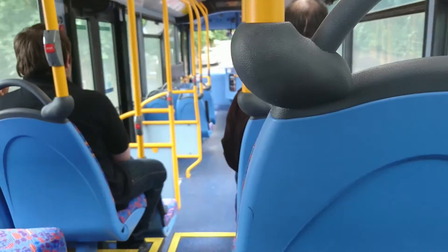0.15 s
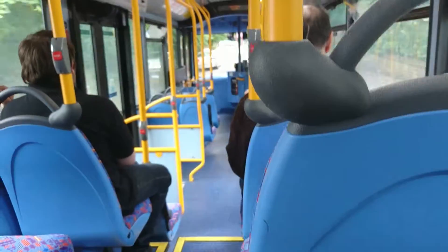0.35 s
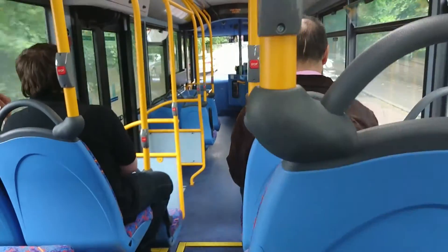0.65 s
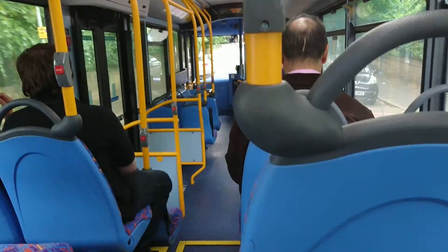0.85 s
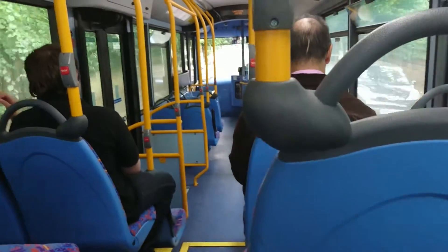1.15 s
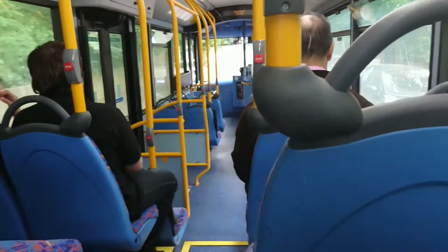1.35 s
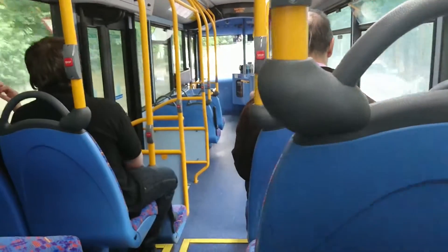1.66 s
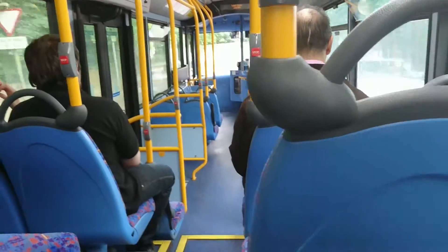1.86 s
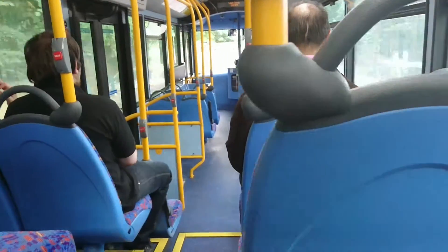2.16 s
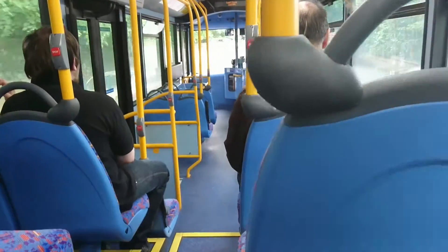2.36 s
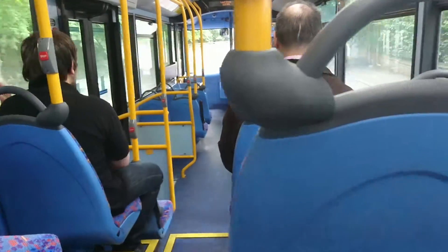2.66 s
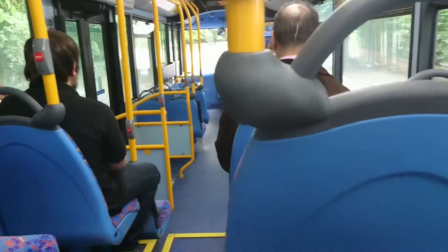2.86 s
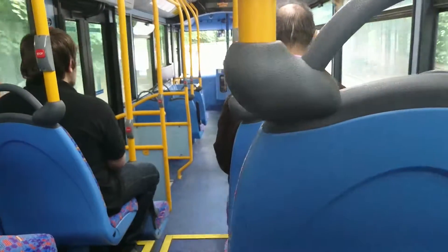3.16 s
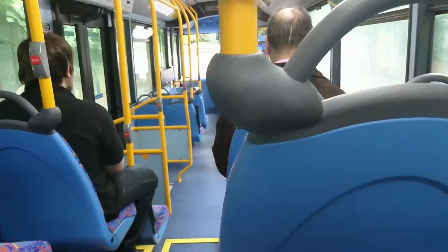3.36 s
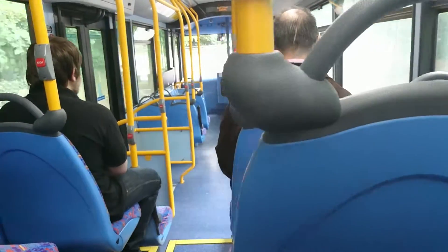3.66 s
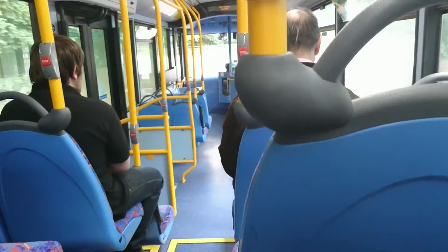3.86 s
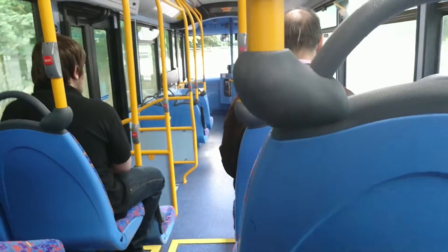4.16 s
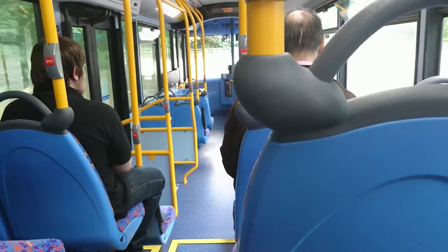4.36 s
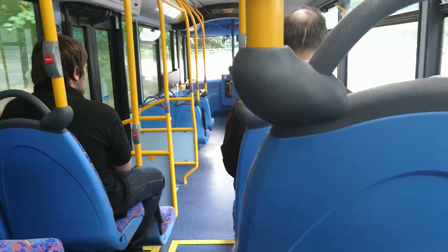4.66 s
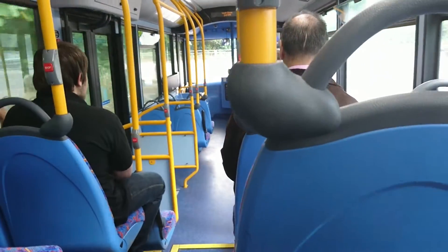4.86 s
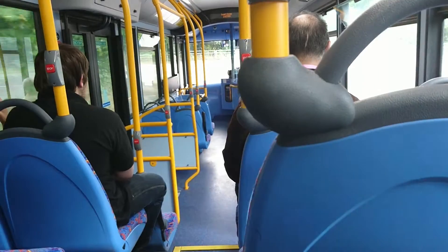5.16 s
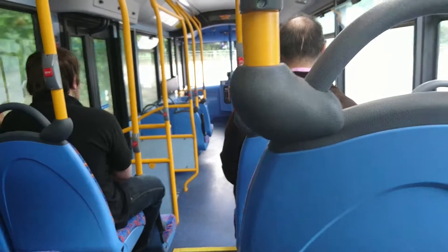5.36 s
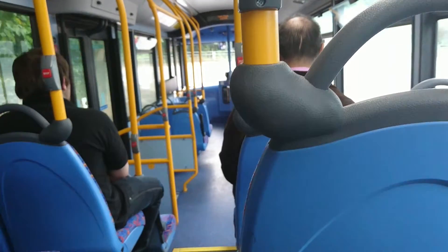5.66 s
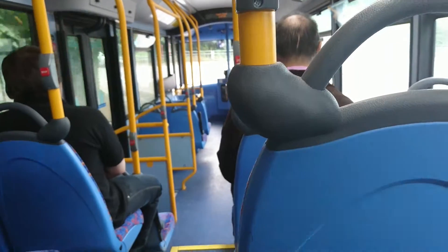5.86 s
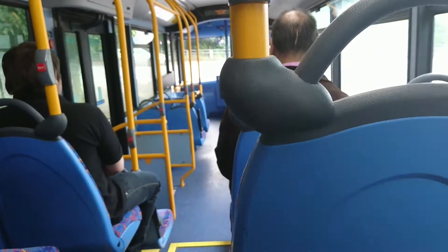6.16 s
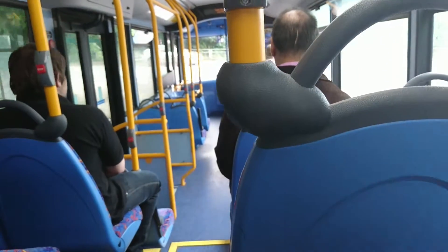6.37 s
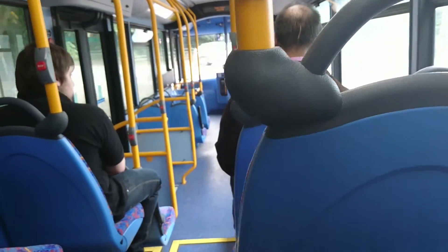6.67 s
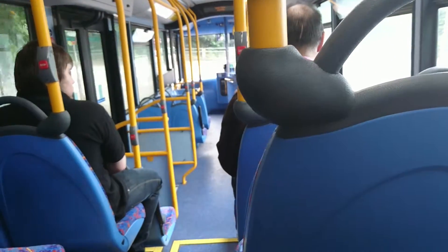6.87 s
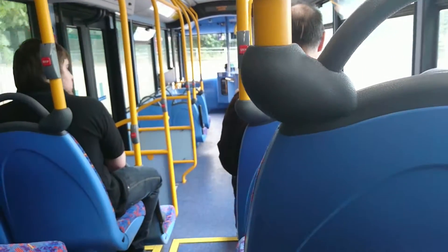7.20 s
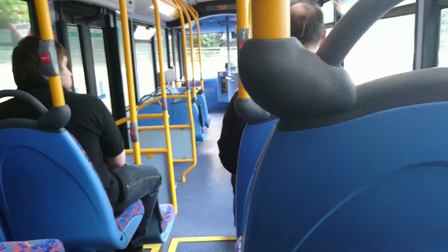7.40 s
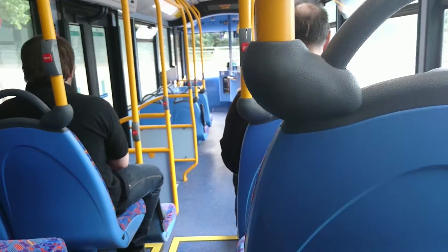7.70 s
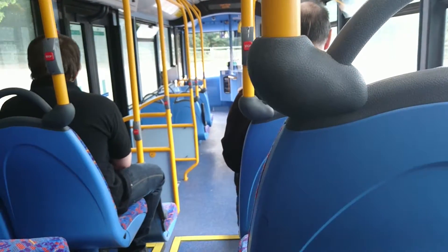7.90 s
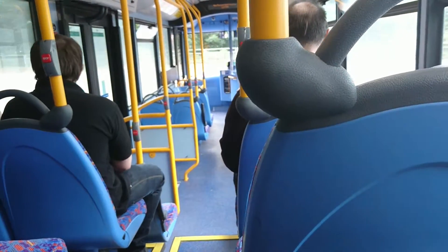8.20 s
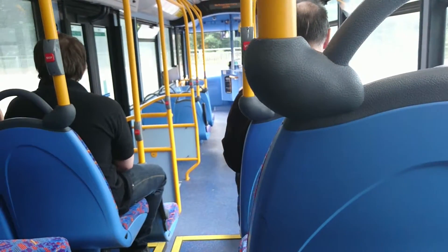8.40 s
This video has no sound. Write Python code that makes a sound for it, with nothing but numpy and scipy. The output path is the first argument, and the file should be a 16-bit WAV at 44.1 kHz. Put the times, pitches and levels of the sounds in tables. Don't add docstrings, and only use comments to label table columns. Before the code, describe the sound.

Close, boxy bus saloon with constant bass-heavy tyre and air roar. The engine drone slides down, eases, jumps back up during a gear change with a brief shaft hum, wavers, then falls away deep and soft. A pump whine follows the same pitch curve. Loose plastic and poles chatter, knock and squeak mostly early on; later there are only lighter bumps and faint creaks. Captured by a small camera in a rear seat.

```python
import sys
import numpy as np
from scipy import signal
from scipy.fft import rfft, irfft, next_fast_len
from scipy.io import wavfile
from scipy.ndimage import uniform_filter1d, minimum_filter1d

SR = 44100
rng = np.random.default_rng(int(sys.argv[2]) if len(sys.argv) > 2 else 0)


def boost_factor(decibels):
    exponent = np.asarray(decibels, float) / 20
    return 10 ** exponent


def output_pcm(signal):
    pcm = np.clip(np.atleast_2d(signal).T, -1, 1) * 32767
    wavfile.write(sys.argv[1], SR, np.round(pcm).astype(np.int16))


N = 376613

# time_s, firing_hz, engine_load_db, pump_load_db
DRIVING = [(0.0, 89.5, 5.5, -1), (1.0, 86.75, -1, -1), (1.4, 85.24, 2.5, 0), (2.25, 81.4, -0.5, -3.5),
           (3.0, 74, -2, -1), (3.5, 68.5, -9.5, -7.5), (3.8, 79.23, -2, 2.5), (4.0, 84.24, 3.5, 0.5),
           (4.14, 86.65, 2, -11.5), (4.5, 81.0, 1, 3), (4.8, 75.3, -7.5, -2), (5.3, 82.76, 2, 1),
           (5.61, 85.4, 3, 1), (6.4, 74.63, -4.5, 2.5), (6.98, 63.77, -12, 1), (7.4, 46.17, -15, -4.5),
           (7.62, 47.5, -7, 1.5), (8.54, 45.03, -12.5, -8)]
# multiple_of_firing, level_db over the roar per Hz at that pitch
WEAK_ORDERS = [
    (.75, 14),
    (2, 6),
    (3, 9),
]
# mode_hz, width_hz, level_db
SALOON_MODES = [(36, 4.8, -34), (45.2, 1.7, -19.5), (81, 8.1, -19.5), (111, 6.9, -19), (133.4, 6.2, -23),
                (158.8, 3.3, -33.5), (199.8, 9.8, -20), (243.6, 7.4, -20), (256, 6, -37),
                (287.5, 5.24, -21), (298, 12, -27.5), (430, 14, -11), (475, 44, -21.5), (566.6, 13, -21)]
# multiple_of_whine, level_db, resonance_hz, width_hz
WHINE_OVERTONES = [(3, -49.5, 630, 160), (7, -42, 2085, 50), (8, -47, 2064, 110), (4, -49.5, 615, 30)]
# time_s, pitch_hz, level_db
SHAFT_HUM = [
    (3.1, 143.5, -60),
    (3.3, 141.3, -30.5),
    (3.75, 130, -31),
    (4.1, 122, -36),
    (4.4, 118.6, -64),
]
# start_s, strength_db, ring_s
TRIM_JOLTS = [(0.818, 7, 0.064), (1.09, -0.5, 0.041), (1.34, 4, .02), (1.461, 13.5, 0.03),
              (1.552, 14, 0.029), (1.59, 11.5, 0.04), (1.66, 10.5, .022), (1.717, 16, 0.021),
              (2.005, 5.5, 0.029), (2.085, 12, 0.069), (2.182, 14.5, 0.09), (2.275, 13.5, 0.047),
              (2.33, 7, 0.024), (2.545, 7, 0.047), (3.429, 5, 0.026), (4.38, 4, 0.023)]
# mode_hz, width_hz, boost_db
TRIM_MODES = [(2420, 72, 4.5), (2057, 140, -0.5), (1830, 42, -3), (3580, 20, 1), (4760, 160, 1.5),
              (6200, 39, -2.5), (7120, 57, -5.5)]
# centre_s, length_s, pitch_hz, width_hz, level_db, left_minus_right_db
RUBS = [(0.496, .06, 3720, 55.56, -56, 12), (2.145, 0.12, 13200, 500, -73, 6),
        (2.615, .16, 11500, 300, -74, 5), (2.932, .07, 14100, 800, -66, 7),
        (2.968, 0.079, 5080, 40, -60, 4), (3.527, 0.1, 2420, 80, -44, -11), (3.747, 0.18, 8040, 60, -74, 4),
        (6.342, 0.031, 13810, 1620, -70, 3.5), (6.726, 0.11, 6880, 37.04, -66, 15.5),
        (7.515, .3, 6910, 32.4, -63, 7), (8.0, .2, 8200, 30, -73, 8), (8.326, 0.033, 6600, 295, -58, 4),
        (0.85, 0.084, 2450, 291.6, -44, -2), (1.09, 0.04, 1830, 75.6, -43, -24),
        (1.235, .04, 1930, 70, -43, -19), (2.552, 0.047, 2390, 74, -43, -4),
        (3.765, .12, 2120, 55, -42, -18)]
# centre_s, pitch_hz, level_db
FAINT_TICKS = [(.56, 12860, -80), (1.219, 13660, -78), (2.49, 12960, -81), (4.079, 13800, -86),
               (4.382, 13100, -83.5), (4.51, 13400, -80), (5.32, 13500, -91), (5.95, 13700, -80),
               (7.41, 13400, -80), (7.959, 13700, -84), (8.15, 13200, -81), (8.34, 13200, -89)]
# mode_hz, width_hz, level_db
SHELL_MODES = [(138.9, 1.5, -38.5), (207.4, 6.6, -39), (245, 7.2, -46.5), (277.6, 2.8, -36),
               (311.6, 2.8, -39.5), (403.6, 1.9, -44.5), (441.5, 22, -40.5), (622.5, 22, -54),
               (2120, 56, -54)]
# time_s, level_db
ROUGHNESS = [(0.0, -33), (1.2, -34), (1.6, -32), (2.0, -33.5), (3.2, -33.5), (4.0, -35.5), (5.7, -36),
             (7.0, -38), (8.54, -39)]
# centre_s, length_s, trim_shake_db, roar_swell_db
BROKEN_PATCHES = [(0.307, 0.26, 5, 2.5), (.6, .2, -3.5, -1), (0.916, 0.14, 8, -2), (1.08, .05, 4, 0.5),
                  (1.317, 0.09, 4, 1), (1.607, 0.29, 12.5, 2), (1.785, .12, 7, -1.5), (2.056, .08, 6, 1.5),
                  (2.239, .12, 6.5, 4), (2.385, 0.15, 12, 0.5), (2.607, 0.22, 5, 0.5),
                  (2.971, 0.44, 10, -1.5), (3.584, 0.45, 2.5, -1.5), (4.757, 0.13, 0, -1),
                  (5.131, 0.13, 5, -0.5), (5.824, 0.18, 4.5, 0), (6.243, 0.2, 3, -0.5),
                  (7.555, 0.12, 0.5, 4)]
# centre_s, level_db over the rumble
AXLE_THUMPS = [(.31, 3), (.48, 10), (.64, 5.5), (.9, 9.5), (1.04, 6.5), (1.14, 3), (1.5, 13), (1.69, 8),
               (1.95, 5), (2.17, 11), (2.29, 13), (2.89, 7.5), (3.12, 9.5), (3.32, 0), (3.95, 7.5),
               (4.45, 1.5), (4.9, 1), (5.18, 7.5), (5.8, 9.5), (6.35, 3), (6.6, 5.5), (6.92, 1.5),
               (7.11, 6), (7.25, 8), (7.56, 5), (8.06, 3), (8.44, 4)]
# pitch_hz, left_db per Hz, right_db per Hz, likeness 0-1
MIC_PORTS = [(41.7, -54.5, -65, 0.9), (83, -56.5, -44.5, 0.6), (130, -59, -56, .91),
             (315, -59, -56.5, 0.82), (326, -65, -63, 0.83), (575, -67.5, -64.5, 0.52),
             (790, -73.5, -71, 0.06), (1420, -76, -72.5, 0.1), (2106, -88.5, -64.5, 0.02),
             (2664, -84.5, -85, 0.06), (4670, -94, -92, 0), (5940, -97, -96.5, 0), (6830, -92, -100.5, .05),
             (9540, -124, -123, 0.5)]

WHINE_RATIO = 3.37
FLYWHEEL_S = 0.06
HALF_ORDER_DB, THIRD_ORDER_DB, SECOND_OVERTONE_DB = -4.45, -12.5, -20.5
SWAY_PER_ROAD_DB = 2.5
CALM_RATTLE_DB, RATTLE_FLOOR_DB = -42, -38.5
STEADY_ROAR_DB, HISS_TOP_HZ = -38, 11300
RUMBLE_DB, RUMBLE_PER_ROAD_DB, RUMBLE_WANDER_DB = -31, 0.98, 2
THUMP_S = 0.11
CONTROL_STEP = 64


def unit(x):
    return x / np.sqrt(np.mean(x ** 2))


def columns(table):
    s, *rest = np.transpose(table)
    return [np.interp(np.arange(N) / SR, s, column) for column in rest]


def fill_in(coarse, step=CONTROL_STEP):
    return np.interp(np.arange(N) / step, np.arange(len(coarse)), coarse)


def walk(rate):
    step = 32
    hold = int(SR / rate / step)
    steps = np.arange(N // step + 2)
    knots = rng.standard_normal(len(steps) // hold + 2)
    coarse = np.interp(steps / hold, np.arange(len(knots)), knots)
    return fill_in(unit(uniform_filter1d(coarse, hold)), step)


def humps(rows):
    t = np.arange(0, N, CONTROL_STEP) / SR
    coarse = sum(db * np.exp(-(2 * (t - s) / length) ** 2) for s, length, db in rows)
    return fill_in(coarse)


def ring(x, hz, width):
    return signal.lfilter(*signal.iirpeak(hz, hz / width, fs=SR), x)


def pan(db):
    return np.array([[db], [-db]]) / 2


def port(hz, count):
    table = np.array(MIC_PORTS)
    return np.interp(np.log(np.maximum(hz, 1)), np.log(table[:, 0]), table[:, count])


def port_balance_db(hz):
    return port(hz, count=1) - port(hz, count=2)


def roar_db_at(hz):
    return np.maximum(port(hz, count=1), port(hz, count=2))


def saloon_db(hz):
    coarse = hz[::CONTROL_STEP]
    answer = sum(boost_factor(db) / (1 + 2j * (coarse - mode_hz) / width) for mode_hz, width, db in SALOON_MODES)
    return fill_in(20 * np.log10(np.abs(answer)))


def tone(hz, db, wobble_db=0.0, rate=12, share=1, rough=0.21, lean_db=0.0):
    ratio = boost_factor(lean_db + share * port_balance_db(hz[::CONTROL_STEP]))
    left = fill_in(2 * ratio / (1 + ratio))
    phase = 2 * np.pi * (np.cumsum(hz) / SR + rng.random()) + rough * walk(2 * rate)
    level = np.sqrt(2) * boost_factor(db + wobble_db * walk(rate))
    return level * np.sin(phase) * np.array([left, 2 - left])


def coloured(mid, side, tilt_db=0.0):
    size = next_fast_len(N)
    hz = np.arange(size // 2 + 1) * SR / size
    like = np.clip(port(hz, count=3), 0, 1)
    shared = rfft(mid, size) * np.sqrt(1 + like)
    apart = rfft(side, size) * np.sqrt(1 - like)
    tilt = boost_factor(tilt_db * np.log2(np.maximum(hz, 20) / 2000))
    colour = boost_factor(np.array([port(hz, count=1), port(hz, count=2)]))
    gains = colour * np.sqrt(SR / 4) * tilt * (hz < HISS_TOP_HZ)
    return np.array([shared + apart, shared - apart]) * gains, hz, size


def engine(hz, load_db, sway_db):
    half_hz, third_hz = hz / 2, hz * 3 / 2
    out = tone(hz, load_db + saloon_db(hz), wobble_db=0.84)
    half_db = sway_db + HALF_ORDER_DB + saloon_db(half_hz)
    out = out + tone(half_hz, half_db, wobble_db=2.5, rate=4, share=0, lean_db=-5.5)
    out = out + tone(third_hz, THIRD_ORDER_DB + saloon_db(third_hz), wobble_db=4.0, rate=5)
    for multiple, db in WEAK_ORDERS:
        order_hz = multiple * hz
        out = out + tone(order_hz, db + roar_db_at(order_hz), wobble_db=1.0, rate=5)
    return out


def whine(hz, load_db):
    second_db = 0.36 * load_db + SECOND_OVERTONE_DB + saloon_db(2 * hz)
    out = tone(hz, load_db + saloon_db(hz), wobble_db=0.9, rate=8, share=0.4)
    out = out + tone(2 * hz, second_db, wobble_db=1.5, rate=6)
    for multiple, db, centre_hz, width in WHINE_OVERTONES:
        passed_db = -10 * np.log10(1 + ((multiple * hz - centre_hz) / width) ** 4)
        out = out + tone(multiple * hz, db + passed_db, wobble_db=3.5, rate=14, rough=0.27 * multiple)
    return out


def prop_shaft():
    return tone(*columns(SHAFT_HUM))


def rattle(level_db):
    t = np.arange(N) / SR
    power = np.maximum(boost_factor(2 * (level_db - RATTLE_FLOOR_DB)) - 1, 0)
    for s, db, ring_s in TRIM_JOLTS:
        times = s + ring_s * np.array([0, 0.03, 1, 3])
        power = power + np.interp(t, times, boost_factor(2 * db) * np.array([0.0065, 0.95, 0.19, 0.0018]))
    knocks = (rng.random(N) < 1200 / SR) * boost_factor(2.5 * rng.exponential(size=N))
    tail = np.exp(-np.arange(2048) / (0.004 * SR))
    shake = np.abs(signal.fftconvolve(knocks, tail)[:N]) * boost_factor(1.8 * walk(22))
    raw = rng.standard_normal((2, N)) * np.sqrt(shake / shake.mean() * power)
    spectra, hz, size = coloured(*raw, tilt_db=0.62)
    modes = 1 + sum(boost_factor(db) / (1 + 2j * (hz - mode_hz) / width) for mode_hz, width, db in TRIM_MODES)
    low_cut = hz ** 2 / (hz ** 2 + 180 ** 2)
    return boost_factor(-2.0) * irfft(spectra * modes * low_cut, size)[:, :N]


def squeaks():
    out, t = np.zeros((2, N)), np.arange(N) / SR
    ticks = [(s, 0.03, hz, 500, db, 0) for s, hz, db in FAINT_TICKS]
    settle = 4096
    for s, length, hz, width, db, pan_db in RUBS + ticks:
        start = int(max(s - 2 * length, 0) * SR)
        end = min(int((s + 2 * length) * SR), N)
        noise = rng.standard_normal(end - start + settle)
        rub = unit(ring(ring(noise, hz, width), hz, width))[settle:]
        shape = np.exp(-(2 * (t[start:end] - s) / length) ** 4)
        out[:, start:end] += rub * shape * boost_factor(db + pan(pan_db))
    return out


def shell(rumble_db):
    out = 0
    for hz, width, db in SHELL_MODES:
        ringing = ring(ring(rng.standard_normal(N), hz, width), hz, 4 * width)
        out = out + unit(ringing) * boost_factor(db + pan(port_balance_db(hz)))
    return out * boost_factor(0.42 * (rumble_db + 25.5))


def roar(roar_db, rumble_db, firing):
    spectra, hz, size = coloured(*rng.standard_normal((2, N)))
    band_place = 2 * np.log2(np.maximum(hz, 1) / 28)
    throb = np.cos(2 * np.pi * firing)
    calm_db = uniform_filter1d(minimum_filter1d(roar_db, SR // 2), SR // 2)
    out = 0
    for k in range(19):
        mask = np.cos(np.pi / 2 * np.clip(band_place - k, -1, 1)) ** 2
        band = irfft((spectra * mask).astype(np.complex64), size)[:, :N]
        low = np.clip((7 - k) / 3, 0, 1)
        high = np.clip((k - 9) / 3, 0, 1)
        bass_db = low * min(k / 3, 1) * (rumble_db + 30.5)
        upper_db = (1 - low) * ((1 - high) * roar_db + high * calm_db - STEADY_ROAR_DB)
        wander_db = 0.8 * walk(2.14) + 1.4 * walk(14)
        out = out + band * boost_factor(bass_db + upper_db + wander_db + 0.71 * (1 - low) * throb)
    return out


def scene():
    hz, load_db, pump_db = columns(DRIVING)
    hz = uniform_filter1d(hz, int(FLYWHEEL_S * SR), mode="nearest")
    rough_db, = columns(ROUGHNESS)
    road_change_db = rough_db - rough_db[0]
    roar_db = rough_db + humps((s, length, swell) for s, length, _, swell in BROKEN_PATCHES)
    rattle_db = CALM_RATTLE_DB + humps((s, length, shake) for s, length, shake, _ in BROKEN_PATCHES)
    rumble_db = RUMBLE_DB + RUMBLE_PER_ROAD_DB * road_change_db + RUMBLE_WANDER_DB * walk(6)
    rumble_db = rumble_db + humps((s, THUMP_S, db) for s, db in AXLE_THUMPS)
    drive = engine(hz, load_db, SWAY_PER_ROAD_DB * road_change_db)
    drive = drive + whine(WHINE_RATIO * hz, pump_db) + prop_shaft()
    trim = rattle(rattle_db) + squeaks()
    road = shell(rumble_db) + roar(roar_db, rumble_db, np.cumsum(hz) / SR)
    return drive + trim + road


def low_pass(x):
    return signal.sosfilt(signal.butter(12, 14700, fs=SR, output="sos"), x)


def record(dry):
    low_cut = signal.butter(2, 36, "high", fs=SR, output="sos")
    mix = signal.sosfilt(low_cut, dry)
    return low_pass(mix)


dry = scene()
out = record(dry)
output_pcm(out)
```